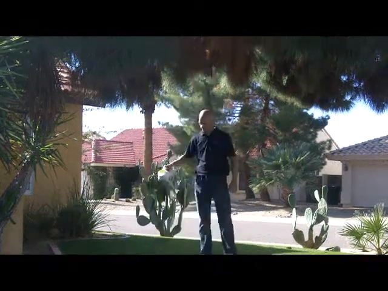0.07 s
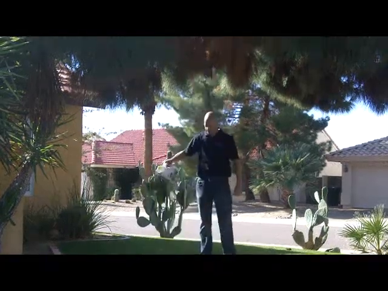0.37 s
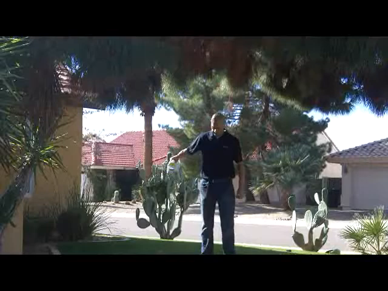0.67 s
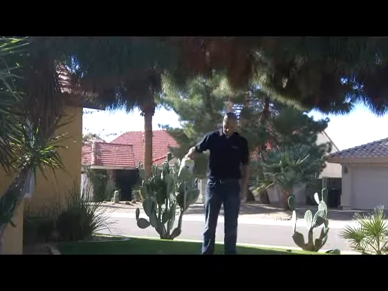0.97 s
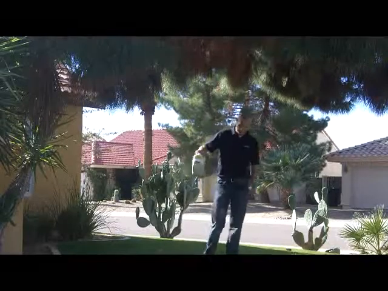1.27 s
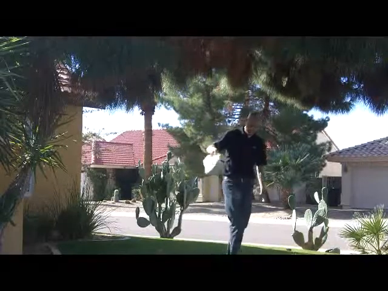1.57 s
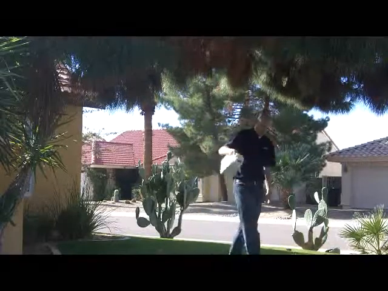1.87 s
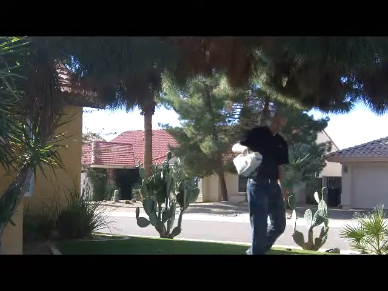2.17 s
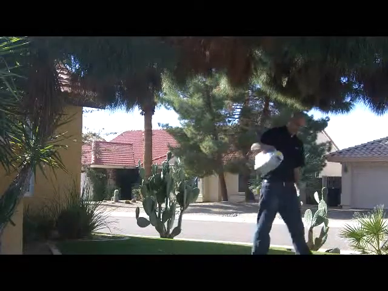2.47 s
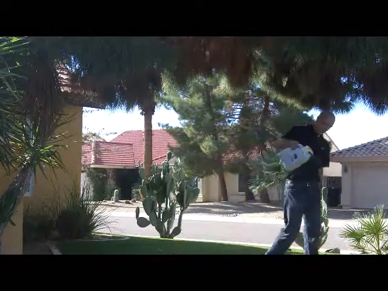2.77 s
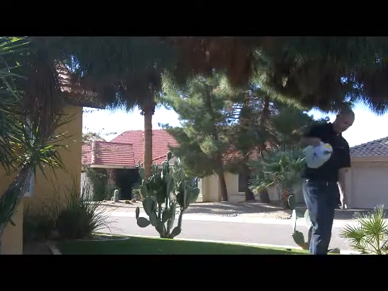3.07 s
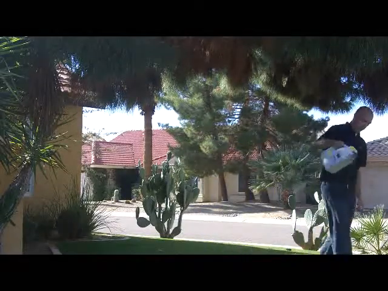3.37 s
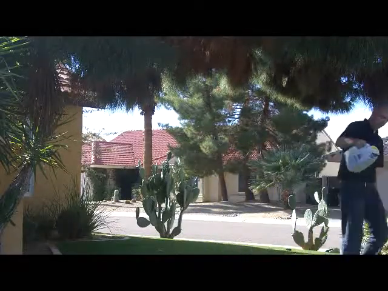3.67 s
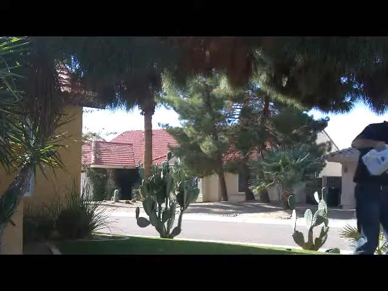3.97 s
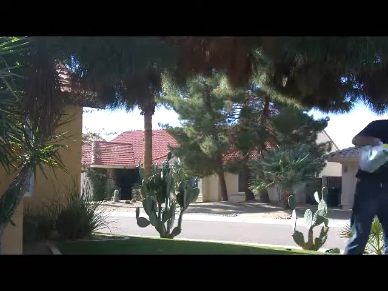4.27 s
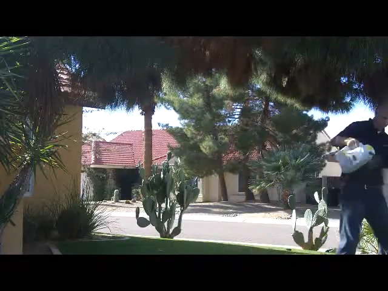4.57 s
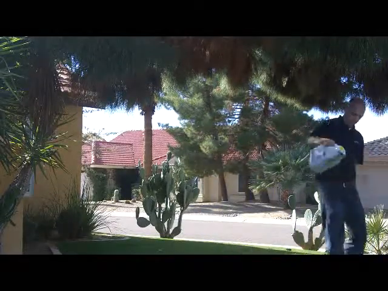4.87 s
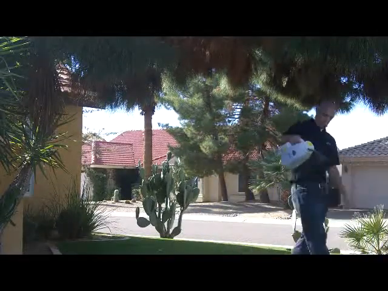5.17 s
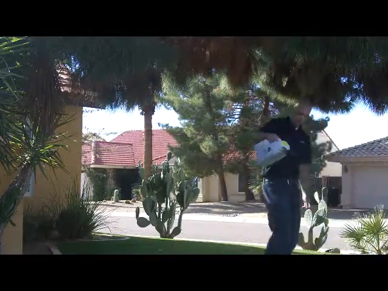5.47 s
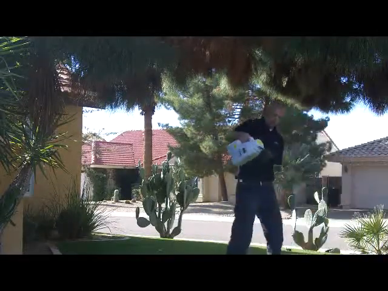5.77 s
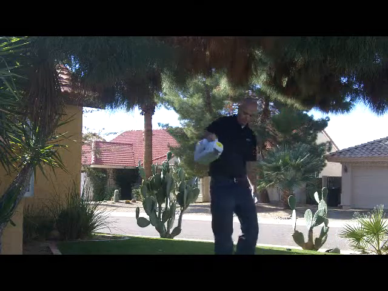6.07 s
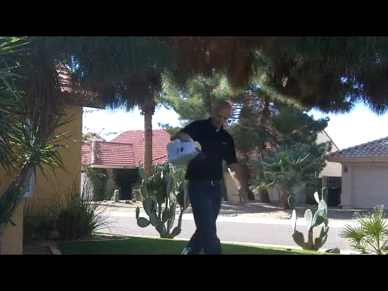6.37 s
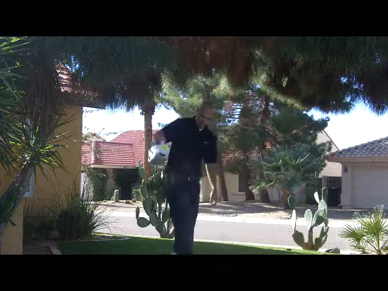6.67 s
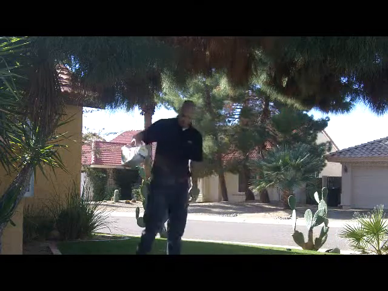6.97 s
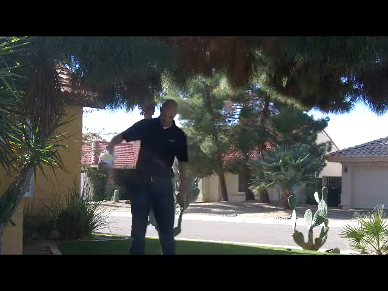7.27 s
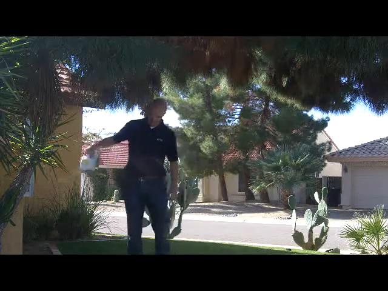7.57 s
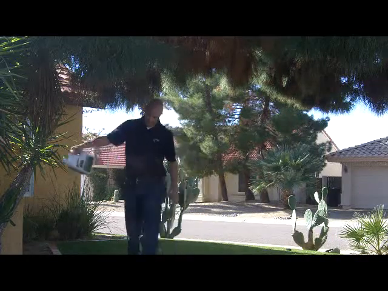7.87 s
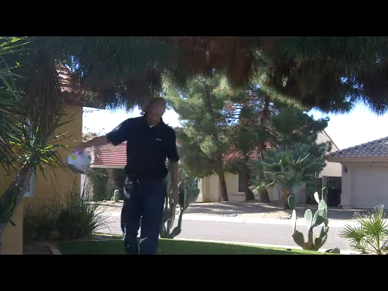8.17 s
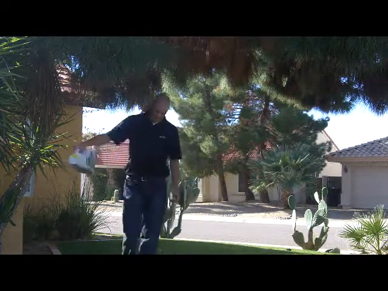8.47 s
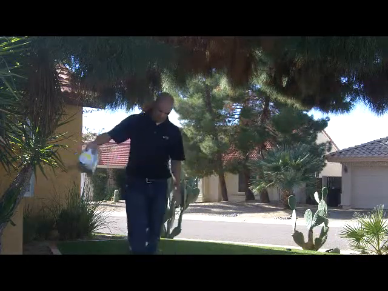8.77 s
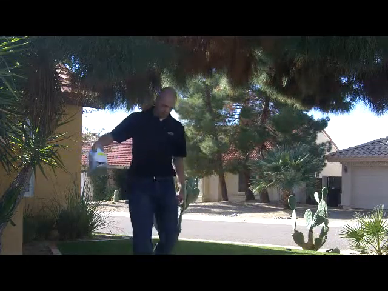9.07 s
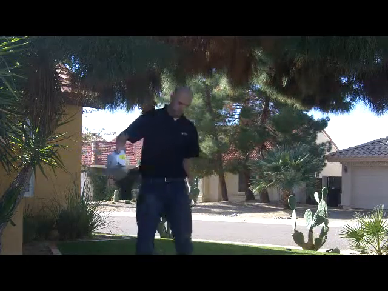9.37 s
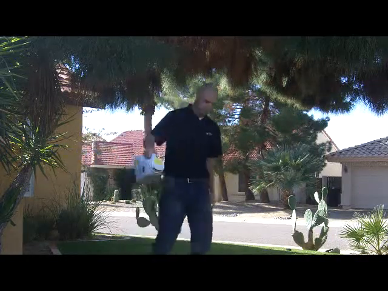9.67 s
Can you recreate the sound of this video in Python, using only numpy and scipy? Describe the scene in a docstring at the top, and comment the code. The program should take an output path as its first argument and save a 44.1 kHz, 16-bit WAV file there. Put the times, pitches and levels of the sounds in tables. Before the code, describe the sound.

Granules rattle in a plastic jug shaken quickly and steadily outdoors, with brief wind rumble on the microphone.

```python
"""Shaking granules over a lawn

Someone paces a lawn, shaking granules out of a plastic jug at about ten strokes a second.
Each stroke throws a shower of grains at the wall: they tick brightly and make the hollow jug rustle.
The bounce off the ground colours the rattle as the jug moves. Gusts buffet the microphone early on,
and a far engine drones under the outdoor rumble."""
import sys
import numpy as np
from scipy import signal
from scipy.fft import rfft, irfft, next_fast_len
from scipy.io import wavfile
from scipy.ndimage import uniform_filter1d

SR = 44100
rng = np.random.default_rng(int(sys.argv[2]) if len(sys.argv) > 2 else 0)


def dump_mix(stems):
    """Bounce the given channels to the path in sys.argv[1] as a 16-bit WAV at rate SR."""
    frames = np.atleast_2d(stems).T  # one column per channel
    limited = np.clip(frames, -1, 1)  # hard clip at full scale
    pcm = np.round(limited * 32767).astype(np.int16)
    wavfile.write(sys.argv[1], SR, pcm)


N = 428211
TIME = np.arange(N) / SR


def undb(db):
    """Decibels to gain."""
    return 10 ** (np.asarray(db) / 20)


def unit(x):
    """Scale to rms 1."""
    return x / np.sqrt(np.mean(x ** 2))


def colour(x, points):
    """Causal EQ of unit power through (Hz, dB) points."""
    hz, db = np.transpose(points)
    size = next_fast_len(N + 8192)
    freqs = np.arange(size // 2 + 1) * SR / size
    gain = unit(undb(np.interp(np.log(freqs + 1), np.log(hz), db)))
    cepstrum = irfft(np.log(gain), size)
    cepstrum[1:size // 2] *= 2  # minimum phase: nothing rings ahead of a hit
    cepstrum[size // 2 + 1:] = 0
    return irfft(rfft(x, size) * np.exp(rfft(cepstrum)), size)[:N]


def drift(rate_hz):
    """Smooth random modulation of rms 1."""
    hold = int(SR / rate_hz)
    steps = np.repeat(rng.standard_normal(N // hold + 1), hold)
    return unit(uniform_filter1d(uniform_filter1d(steps, hold), hold)[:N])


def swell(at, half_length):
    """A bell-shaped surge with long skirts."""
    return 1 / (1 + ((TIME - at) / half_length) ** 2) ** 2


# The low hum of the neighbourhood. Each row: pitch in Hz, level in dB.
HUM_TONES = [(18.5, -38.5), (91, -58), (119, -63.5)]
# EQ of the outdoor bed. Each row: frequency in Hz, relative level in dB.
AIR_EQ = [(8, -1.5), (18, -1.5), (32, -12), (60, -12), (120, -19.5), (200, -22), (350, -30), (700, -33),
          (1500, -34.5), (4000, -48), (8000, -60), (15000, -66)]


def outdoors(air_db=-43):
    """Steady rumble of the neighbourhood with a wavering hum and a faint hiss."""
    hum = np.zeros(N)
    for hz, db in HUM_TONES:
        amplitude = np.sqrt(2) * undb(db + 2 * drift(2.8))
        hum += amplitude * np.sin(2 * np.pi * hz * TIME + 0.51 * drift(3.4))
    air = colour(rng.standard_normal(N), AIR_EQ)
    return hum + air * undb(air_db + 1.13 * drift(2.91))


# The ride of the engine drone. Each row: time in seconds, firing rate in Hz,
# base level of the fundamental in dB, base level of the overtones in dB.
ENGINE_RIDE = [(.3, 80.4, -58.5, -48.5), (1.6, 79.4, -54.5, -56), (3, 80.13, -60, -59),
               (4.5, 80.26, -60.5, -52), (5.4, 80.1, -59.5, -59), (6.7, 79.9, -52, -58),
               (7.8, 80.1, -54, -53.5), (8.2, 79.6, -46, -45), (8.8, 79.04, -46, -55),
               (9.3, 78.4, -51, -51), (9.7, 78, -55, -52.5)]
# Its harmonics. Each row: multiple of the firing rate, trim on the base level in dB.
ENGINE_HARMONICS = [(1, 1), (2, -3.5), (3, -11)]


def far_engine(waver=0.005, fading_db=2.0):
    """A low drone whose harmonics fade in and out on the way."""
    times, hz, fundamental_db, overtone_db = np.transpose(ENGINE_RIDE)
    firing_hz = np.interp(TIME, times, hz) * (1 + waver * drift(9))
    phase = 2 * np.pi * np.cumsum(firing_hz) / SR
    drone = np.zeros(N)
    for multiple, trim_db in ENGINE_HARMONICS:
        db = np.interp(TIME, times, fundamental_db if multiple == 1 else overtone_db)
        drone += undb(db + trim_db + fading_db * drift(6.6)) * np.sin(multiple * phase)
    return drone


# Gusts on the microphone. Each row: start in seconds, length in seconds, relative level in dB.
WIND_GUSTS = [(0.998, 0.055, -31), (1.153, .12, -27), (1.424, 0.053, -28), (1.878, 0.35, -28.5),
              (2.31, 0.11, -27), (2.54, 0.094, -32.5), (3.018, 0.18, -34), (3.175, 0.32, -23.5),
              (3.568, 0.064, -23.5), (3.662, 0.063, -22.5)]
# Their sub-heavy EQ. Each row: frequency in Hz, relative level in dB.
GUST_EQ = [(8, -24), (18, 2.5), (32, 2.5), (55, -11), (90, -22.5), (160, -35), (320, -46), (900, -84)]


def gusts(gain_db=-3.5, attack_s=0.032, release_s=0.053):
    """Deep wind rumble on the microphone: each gust rises quickly, holds and dies away."""
    power = np.zeros(N)
    for start, length, db in WIND_GUSTS:
        rise = np.clip((TIME - start) / attack_s, 0, 1)
        fall = np.exp(-np.maximum(TIME - start - length, 0) / release_s)
        power += (undb(db + gain_db) * rise * fall) ** 2
    rumble = colour(rng.standard_normal(N), GUST_EQ)
    rumble /= np.sqrt(uniform_filter1d(rumble ** 2, SR // 8))  # levelled, so the gusts set the shape
    return np.sqrt(power) * rumble


# Wind thumps. Each row: centre in seconds, relative peak in dB, half length in seconds.
EDDY_HITS = [(1.04, -19, 0.0034), (2.377, -23, 0.0082), (2.494, -27.5, 0.0027), (3.247, -24, 0.0051),
             (3.365, -27, 0.0048), (3.509, -20, 0.0053), (3.7, -18.5, 0.0071)]


def eddies(gain_db=-1, flutter_db=-13):
    """An eddy hitting the microphone gives one swing of pressure and a short flutter."""
    flutter_eq = [(20, -17), (60, 3.0), (110, 0), (160, -15.5), (260, -36), (900, -79)]
    flutter = undb(flutter_db) * colour(rng.standard_normal(N), flutter_eq)
    thumps = np.zeros(N)
    for at, db, half_length in EDDY_HITS:
        passage = (TIME - at) / half_length
        swing = passage * np.exp((1 - passage ** 2) / 2)
        thumps += undb(db + gain_db) * (swing + flutter * swell(at, 4 * half_length))
    return thumps


def house_walls(x, decay_s=0.03, wet_db=-15.5):
    """Add a short, diffuse return from the house walls, keeping the power."""
    t = TIME[:SR // 4]
    tail = rng.standard_normal(len(t)) * np.exp(-t / decay_s)
    tail *= undb(wet_db) / np.linalg.norm(tail)
    return (x + signal.fftconvolve(x, tail)[:N]) / np.sqrt(1 + undb(wet_db) ** 2)


# The ground bounce shifts as the jug is carried about. Each row: time in seconds, delay in ms.
BOUNCE_DELAY = [(.3, 0.99), (.9, 1.12), (2.4, 1.31), (3.3, 1.51), (5.3, 1.64), (6.8, 1.55), (7.3, 1.33),
                (8.3, 1.29), (8.8, 1.5), (9.7, 1.55)]


def ground_bounce(x, bounce_db=-9, grass_hz=5000):
    """Add the bounce off the lawn: a moving comb, weaker in the treble, which the grass soaks up."""
    times, delay_ms = np.transpose(BOUNCE_DELAY)
    dulled = signal.filtfilt(*signal.butter(1, grass_hz, fs=SR), x)
    delayed_time = TIME - np.interp(TIME, times, delay_ms) / 1000
    return x + undb(bounce_db) * np.interp(delayed_time, TIME, dulled)


# The tempo, about five shakes a second, even between rows. Each row: time in seconds, shakes so far.
SHAKE_PACE = [(0.401, 0), (2.032, 9), (2.625, 12), (3.27, 15), (4.833, 23), (6.005, 29), (6.636, 32),
              (7.423, 36), (8.691, 42), (9.697, 47)]
# The effort of the arm. Each row: time in seconds, relative levels of the forward and back strokes in dB.
ARM_EFFORT = [(0.4, -40, -37), (0.6, -38, -39), (0.95, -41, -41), (1.4, -42, -39.5), (2.3, -33.5, -34.5),
              (3.05, -34, -36.5), (3.7, -35, -38.5), (4.2, -37.5, -41), (4.7, -34.6, -38),
              (5.3, -35, -39.5), (5.9, -33, -36.5), (6.6, -33, -36.5), (7.2, -37.5, -38.4),
              (7.7, -41.5, -40.5), (8.15, -34.5, -35.6), (8.8, -36, -37), (9.7, -37.5, -38)]
# How the load slides as the jug tilts. Each row: time in seconds, half length of a shower in seconds,
# share of the shake (0 to 1) that passes before the back stroke.
LOAD_SLIDE = [(0.4, 0.053, 0.4), (1.8, 0.041, 0.53), (2.4, 0.028, 0.49), (3.7, 0.043, 0.58),
              (4.8, 0.037, 0.58), (5.9, 0.027, 0.52), (7.3, 0.03, 0.53), (8.2, 0.025, 0.44),
              (9.7, 0.031, 0.55)]
# How hollow the jug sounds. Each row: time in seconds, send from the stroke to the jug's body in dB.
BODY_SEND = [(.4, -12), (1.9, -10.5), (3.8, -9.5), (6.4, -9.5), (7.6, -12), (8.3, -11.5), (9.7, -11)]


def strokes(forward_send_db=0.68, back_send_db=-0.97, jitter_s=0.002, jitter_db=0.5):
    """Each shake throws the load forward, then back: yields time, level, half length and body send."""
    pace_times, shakes = np.transpose(SHAKE_PACE)
    effort_times, forward_db, back_db = np.transpose(ARM_EFFORT)
    slide_times, half_length, back_share = np.transpose(LOAD_SLIDE)
    forward = np.interp(np.arange(round(shakes[-1]) + 1), shakes, pace_times)
    back = forward[:-1] + np.diff(forward) * np.interp(forward[:-1], slide_times, back_share)
    at = np.concatenate([forward, back])
    db = np.concatenate([np.interp(forward, effort_times, forward_db),
                         np.interp(back, effort_times, back_db)])
    send_db = np.interp(at, *np.transpose(BODY_SEND))
    # the forward stroke hits the broad wall of the jug and booms more
    send_db += np.repeat([forward_send_db, back_send_db], [len(forward), len(back)])
    late, harder = rng.standard_normal((len(at), 2)).T  # no two strokes are quite alike
    half_lengths = np.interp(at, slide_times, half_length)
    return zip(at + jitter_s * late, db + jitter_db * harder, half_lengths, send_db)


def shower(at, half_length, crest_db=-4, crest_width=0.4):
    """Power of one shower of grains: a broad surge with a dense, narrower crest."""
    crest = undb(crest_db) ** 2
    surge = swell(at, half_length) + crest * swell(at, crest_width * half_length)
    return surge / (1 + crest * crest_width)


def impacts(per_second, spread_db):
    """Grains land at random with uneven strength: impulses of unit power."""
    chance = np.clip(per_second / SR, 1e-4, 1)
    strength = unit(undb(spread_db * np.clip(rng.standard_normal(N), -2, 2)))
    lands = rng.random(N) < chance
    return lands * rng.choice([-1, 1], N) * strength / np.sqrt(chance)


def skitter(strikes, decay_s, tail_db):
    """Each impact skitters on briefly in its own random way; the power is kept."""
    feedback = np.exp(-2 / (decay_s * SR))
    energy = signal.lfilter([1 - feedback], [1, -feedback], strikes ** 2 + 1e-18)
    tail = undb(tail_db) * np.sqrt(energy) * rng.standard_normal(N)
    return (strikes + tail) / np.sqrt(1 + undb(tail_db) ** 2)


# Hard accents in the rattle. Each row: start in seconds, relative level in dB, decay in seconds.
CLACK_HITS = [(.473, -31, .0008), (2.223, -28, .003), (2.331, -33, .002), (4.785, -28, .005),
              (5.405, -29, 0.0019), (5.898, -32, .0008), (5.9957, -27, .002), (6.407, -25, .003),
              (8.329, -31, .001), (8.349, -34, .0007), (8.552, -32, 0.00062), (8.559, -33, .0007)]


def clacks(gain_db=-1):
    """Single grains and small clumps hit hard, each a tiny burst of noise."""
    envelope = sum(undb(db + gain_db) * np.exp(-np.abs(TIME - at) / decay) * (TIME >= at)
                   for at, db, decay in CLACK_HITS)
    return envelope * rng.standard_normal(N)


# The bright EQ of the grain ticks. Each row: frequency in Hz, relative level in dB.
TICK_EQ = [(2500, -45), (4200, -21.5), (4900, -10), (5600, -5), (6700, 1), (7900, 1.5), (9000, -3),
           (10300, -10), (12500, -21), (15000, -35.5)]
# The hollow jug, its air resonance low down. Each row: frequency in Hz, relative level in dB.
JUG_EQ = [(180, -33.5), (300, -9.5), (420, -6), (550, -2), (650, 0), (760, -4), (980, -1.5), (1170, -7),
          (1380, -5.5), (1600, -6), (2000, -4), (2600, -3.5), (3200, -6), (3800, -13), (5500, -33.5)]


def shaken_jug(grains_per_s=4500, tick_db=-2.5, body_db=-1):
    """Showers of grains: a harder stroke throws more of them; each ticks and knocks the jug."""
    tick_power, body_power = np.zeros(N), np.zeros(N)
    for at, db, half_length, send_db in strokes():
        tick_power += undb(db) ** 2 * shower(at, half_length)
        # the bulk of the load lands a little later and settles more slowly
        body_power += undb(db + send_db) ** 2 * shower(at + 0.0042, half_length * 1.34)
    grains = impacts(grains_per_s * np.sqrt(tick_power / tick_power.mean()), spread_db=3.5)
    grains *= undb(0.71 * drift(250))  # they arrive in clumps
    strikes = skitter(grains * np.sqrt(tick_power), decay_s=0.0044, tail_db=3.0)
    ticks = colour(undb(tick_db) * strikes + clacks(), TICK_EQ)
    knocks = skitter(grains * np.sqrt(body_power), decay_s=0.0056, tail_db=-4.5)
    return ticks + undb(body_db) * colour(knocks, JUG_EQ)


def scene():
    """The jug between lawn and house walls, over wind, engine and rumble; both channels are the same."""
    jug = house_walls(ground_bounce(shaken_jug()))
    return np.tile(jug + gusts() + eddies() + far_engine() + outdoors(), (2, 1))


def record(dry, start_s=0.312, notch_hz=4240, notch_q=9, top_hz=15250):
    """Master chain: a moment of silence at the head, a notch in the low treble and a steep top cut."""
    gated = dry * (TIME >= start_s)
    notched = signal.lfilter(*signal.iirnotch(notch_hz, notch_q, fs=SR), gated)
    return signal.sosfilt(signal.ellip(8, .2, 70, top_hz, fs=SR, output="sos"), notched)


dry = scene()
out = record(dry)
dump_mix(out)
```